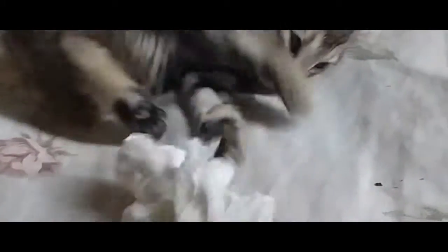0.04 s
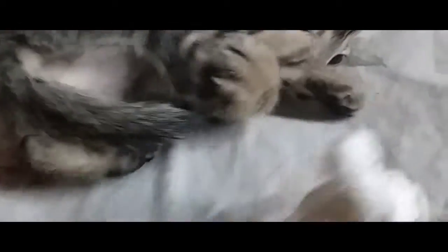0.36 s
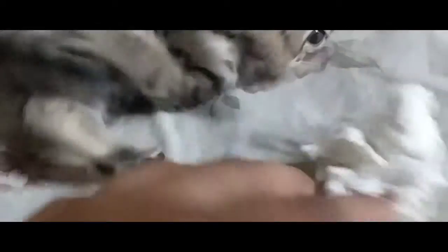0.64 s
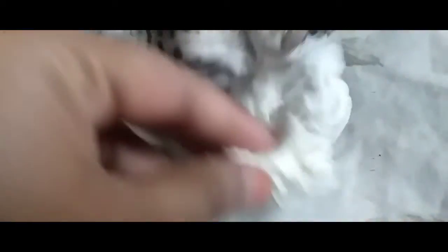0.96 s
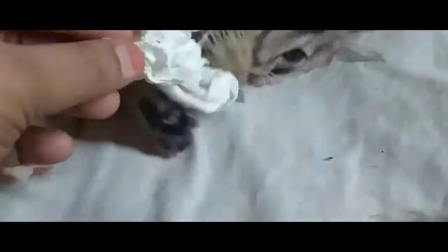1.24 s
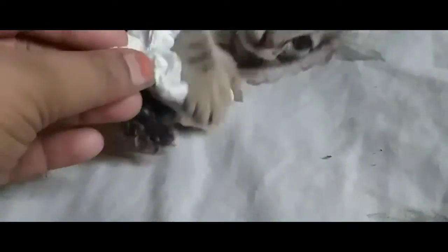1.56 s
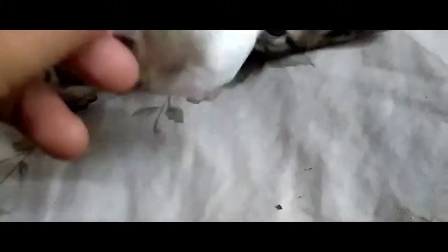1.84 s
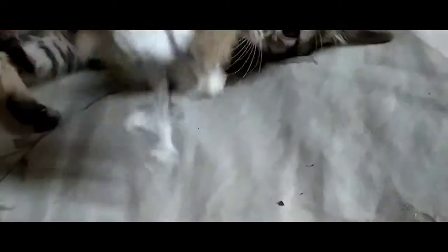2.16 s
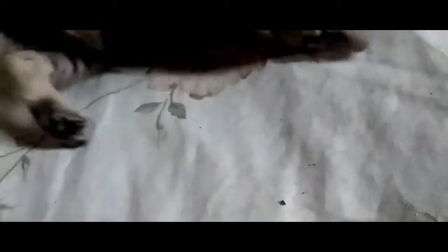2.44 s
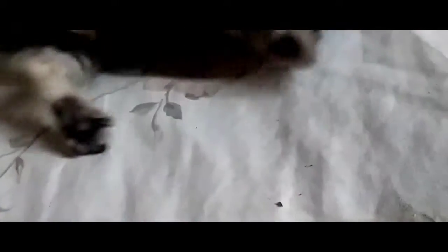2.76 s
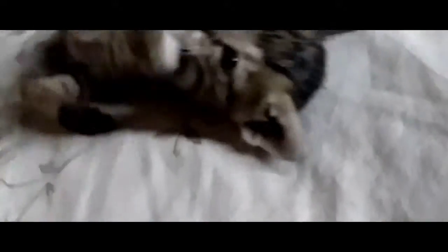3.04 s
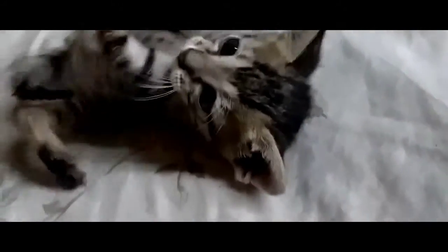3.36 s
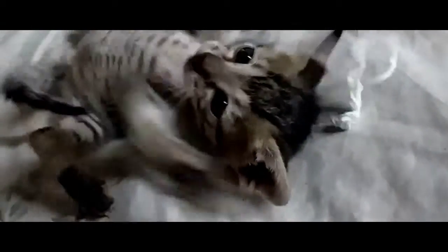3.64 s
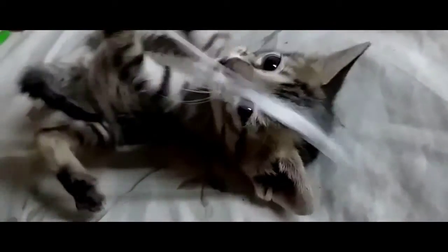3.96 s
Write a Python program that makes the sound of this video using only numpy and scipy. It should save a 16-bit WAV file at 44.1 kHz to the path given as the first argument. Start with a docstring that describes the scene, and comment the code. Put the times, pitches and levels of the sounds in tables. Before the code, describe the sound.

Close to the microphone, a playing kitten thumps and shifts on a mattress, brushing the sheet and sliding tissue paper. The sound and the room's hiss sink to silence, then snap back with further thuds and light claw ticks.

```python
"""On a bed, close up: a kitten plays with a wad of tissue paper over room hiss, rumble and faint hum.
Paws thud and the body scuffles on the mattress, fur rubs the sheet, the sliding tissue whispers,
claws and creases tick. The whole sound fades steadily to silence, then comes back abruptly."""
import sys
import numpy as np
from scipy import signal
from scipy.fft import rfft, irfft, next_fast_len
from scipy.io import wavfile
from scipy.ndimage import uniform_filter1d

SR = 44100
rng = np.random.default_rng(int(sys.argv[2]) if len(sys.argv) > 2 else 0)


def master_out(mix):
    """Clip the mix to full scale and print it as 16-bit PCM to the path in sys.argv[1]."""
    frames = np.transpose(np.atleast_2d(mix))
    ceiling = np.clip(frames, -1, 1)
    pcm = np.round(ceiling * 32767).astype(np.int16)
    wavfile.write(sys.argv[1], SR, pcm)


N = 4 * SR


def amp(db):
    return 10 ** (np.asarray(db) / 20)


def unit_rms(x):
    return x / np.sqrt(np.mean(x ** 2) + 1e-20)


def add(mix, start_s, sound):
    part = mix[max(round(start_s * SR), 0):][:len(sound)]
    part += sound[:len(part)]


def coloured(x, spectrum):
    """Filter by (freq_hz, gain_db) points on a log axis; white noise keeps its power."""
    size = next_fast_len(len(x) + SR // 10)
    hz = np.fft.rfftfreq(size, 1 / SR)
    freq_hz, gain_db = np.transpose(spectrum)
    gain = amp(np.interp(np.log(hz + 1), np.log(freq_hz), gain_db))
    return irfft(rfft(x, size) * unit_rms(gain), size)[:len(x)]


def pressure(strokes, swell_s=0.035, release_s=0.05):
    """Rubbing envelope: each stroke swells, holds and dies away."""
    envelope = np.zeros(N)
    for start_s, length_s, level_db in strokes:
        t = np.arange(0, length_s, 1 / SR)
        ramp = np.clip(np.minimum(t / swell_s, (length_s - t) / release_s), 0, 1)
        add(envelope, start_s, amp(level_db) * np.sqrt(ramp))
    return envelope


def friction(spread_db, hiss_ratio, slips_per_s=2500):
    """Tiny random fibre slips over smooth hiss."""
    slips = (rng.random(N) < slips_per_s / SR) * rng.choice([-1., 1.], N)
    sizes = amp(spread_db * np.minimum(rng.exponential(1, N), 4))
    return unit_rms(unit_rms(slips * sizes) + hiss_ratio * rng.standard_normal(N))


def paw_thuds(rise_s=0.00051, decay_s=0.0053, gain_db=3.5):
    """Each paw presses the mattress, which swings back once or twice."""
    # paw impacts: start_s, relative_level_db, pitch_hz
    impacts = [(0.0058, -20, 138), (0.0134, -24.5, 131), (0.0204, -21, 107), (0.0356, -25.5, 107),
               (0.059, -26, 110), (0.070, -26, 115), (0.295, -15.5, 113), (0.324, -23, 100),
               (0.332, -31, 100), (0.359, -24.5, 106), (0.5751, -18, 126.7), (0.608, -29, 110),
               (0.635, -25, 109), (0.728, -32, 102), (0.769, -24.5, 112.3), (1.138, -27, 90),
               (1.586, -17.5, 140), (1.606, -25, 100), (1.849, -33, 70), (2.177, -24, 82),
               (2.194, -27.5, 100), (2.293, -21.5, 90.5), (2.346, -33, 80), (2.425, -29, 70),
               (2.674, -26, 144), (2.697, -25.5, 122), (3.05, -35, 85), (3.0733, -24.5, 122),
               (3.256, -22.5, 75), (3.282, -28, 95), (3.374, -23, 79.4)]
    out, t = np.zeros(N), np.arange(SR // 10) / SR
    envelope = (1 - np.exp(-t / rise_s)) * np.exp(-t / decay_s)
    for start_s, level_db, pitch_hz in impacts:
        add(out, start_s, -amp(level_db + gain_db) * envelope * np.sin(2 * np.pi * pitch_hz * t))
    return out


def body_scuffles():
    """The body shifts on the mattress: dull bursts of noise."""
    # body movements: start_s, length_s, level_db
    strokes = [(0.0, 0.053, -32), (.31, 0.097, -40), (.51, .15, -34.5), (1.02, 0.22, -39),
               (1.27, 0.11, -39), (1.81, 0.11, -44), (2.06, .13, -41), (2.26, 0.18, -39), (2.63, .1, -43),
               (2.86, 0.17, -38.5), (3.04, 0.07, -36), (3.26, .13, -44.5), (3.92, 0.13, -39.5)]
    # scuffle spectrum: freq_hz, gain_db
    spectrum = [(25, -44), (50, -2.5), (80, 1), (130, 0), (200, -6), (350, -18.5), (700, -27), (2000, -52),
                (16000, -86)]
    return coloured(rng.standard_normal(N) * pressure(strokes), spectrum)


def body_rolls():
    """The kitten rolls over: a grainy midrange rub of the sheet."""
    # rolls: start_s, length_s, level_db
    strokes = [(.04, 0.092, -58), (.42, 0.12, -57), (2.28, 0.21, -57), (2.78, 0.296, -56),
               (3.08, 0.35, -56.5)]
    # rub spectrum: freq_hz, gain_db
    spectrum = [(100, -25), (500, -12), (900, -3), (1500, -14.5), (2200, 1), (3000, -15), (8000, -25.5),
                (16000, -42)]
    return coloured(friction(spread_db=4.5, hiss_ratio=0.84) * pressure(strokes), spectrum)


def fur_brushes():
    """Fur and paws brush the sheet: brighter friction."""
    # brush strokes: start_s, length_s, level_db
    strokes = [(.22, 0.26, -51), (.355, 0.046, -57), (.52, 0.27, -53), (2.27, 0.052, -47),
               (2.34, 0.19, -59.5), (2.595, 0.041, -50), (2.68, .1, -56), (3.22, 0.15, -57)]
    # fur-on-cloth spectrum: freq_hz, gain_db
    spectrum = [(100, -37), (1000, -1), (2500, -5.5), (4000, -1), (6200, -3.5), (7600, -9), (8600, -18),
                (16000, -23)]
    return coloured(friction(spread_db=1.5, hiss_ratio=0.66) * pressure(strokes), spectrum)


def tissue_slides():
    """Soft paper slides in equal-sized slips: a thin, high whisper."""
    # slides: start_s, length_s, level_db
    strokes = [(.25, 0.12, -59), (.355, 0.087, -55), (.41, 0.14, -58), (.52, .33, -55), (.82, 0.14, -58.5),
               (1.82, 0.34, -57), (2.13, 0.3, -58.5), (2.39, 0.15, -58), (2.69, 0.093, -59),
               (3.41, 0.077, -58), (3.81, 0.16, -62)]
    # paper spectrum: freq_hz, gain_db
    spectrum = [(500, -27), (3000, -9), (6300, -5.5), (7100, 0.5), (7800, 0.5), (8300, -18.5), (11300, -12),
                (12300, -18), (15500, -20)]
    return coloured(friction(spread_db=0, hiss_ratio=0.9) * pressure(strokes), spectrum)


def ticks(decay_s=0.00087, tail_s=0.0037, tail_db=-16.5):
    """Claws and creases snap: sharp noise bursts with a slight tail."""
    # snaps: start_s, level_db
    snaps = [(2.3071, -39.5), (2.321, -42), (2.4265, -39.5), (2.4382, -42), (2.446, -44), (2.471, -42),
             (2.614, -42.5), (2.701, -41), (2.7163, -36.5), (3.175, -35)]
    # snap spectrum: freq_hz, gain_db
    spectrum = [(300, -32), (2500, -12), (3800, 8), (5000, 2), (6800, 2.5), (8600, -10), (12000, -10),
                (16000, -18)]
    out, t = np.zeros(N), np.arange(SR // 50) / SR
    envelope = np.exp(-t / decay_s) + amp(tail_db) * np.exp(-t / tail_s)
    for start_s, level_db in snaps:
        add(out, start_s, amp(level_db) * envelope * rng.standard_normal(len(t)))
    return coloured(out, spectrum)


def room_noise(level_db=-41, drift_db=1.0):
    """Steady hiss and rumble; patches of the spectrum drift faintly in level."""
    # room spectrum: freq_hz, gain_db
    spectrum = [(22, -9), (36, -15.5), (55, -1), (115, -2.5), (175, -5.5), (218, 1.5), (290, -4.5),
                (340, -6), (410, -9), (495, -6.5), (670, -15), (1700, -15.5), (2900, -22), (4000, -20.5),
                (6100, -27), (7200, -28.5), (8500, -42), (11500, -42), (13000, -45), (16000, -45)]
    _, _, frames = signal.stft(rng.standard_normal(N), SR, nperseg=1024, noverlap=768)
    drift = uniform_filter1d(rng.standard_normal(frames.shape), size=20, axis=0)  # over frequency
    drift = unit_rms(uniform_filter1d(drift, size=14, axis=1))  # over time
    _, air = signal.istft(frames * amp(drift_db * drift), SR, nperseg=1024, noverlap=768)
    return amp(level_db) * coloured(unit_rms(air[:N]), spectrum)


def room_hum(half_width_hz=8.7):
    """Narrow noise bands: faint tones that waver in level and pitch."""
    # hum tones: pitch_hz, level_db
    tones = [(109, -54), (385, -59.5), (572, -61.5), (1184, -68)]
    out, t = np.zeros(N), np.arange(N) / SR
    band = np.exp(-(np.fft.fftfreq(N, 1 / SR) / half_width_hz) ** 2)
    for pitch_hz, level_db in tones:
        waver = np.fft.ifft(band * np.exp(2j * np.pi * rng.random(N)))
        tone = (waver * np.exp(2j * np.pi * pitch_hz * t)).real
        out += amp(level_db) * unit_rms(tone)
    return out


def scene():
    """Mono sum at one close microphone."""
    room = room_noise() + room_hum()
    kitten = paw_thuds() + body_scuffles() + body_rolls() + fur_brushes()
    return (room + kitten + tissue_slides() + ticks())[None]


def record(dry, low_cut_hz=52, high_cut_hz=15720):
    """Steep bass cut, linear fade to silence, quick return, low-pass."""
    fade_start_s, fade_end_s, return_s, rise_s = 0.06, 1.656, 1.666, 0.025
    t, hz = np.arange(N) / SR, np.fft.rfftfreq(2 * N, 1 / SR)
    high_pass = 1 / np.sqrt(1 + (low_cut_hz / (hz + 1)) ** 14)
    trimmed = irfft(rfft(dry, 2 * N) * high_pass)[:, :N]
    fade_out = np.clip((fade_end_s - t) / (fade_end_s - fade_start_s), 0, 1)
    fade_in = np.clip((t - return_s) / rise_s, 0, 1)
    low_pass = signal.firwin(511, high_cut_hz, window=("kaiser", 9), fs=SR)
    return signal.oaconvolve(trimmed * (fade_out + fade_in), low_pass[None], "same")


dry = scene()
out = record(dry)
master_out(out)
```